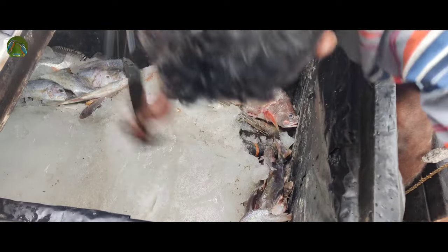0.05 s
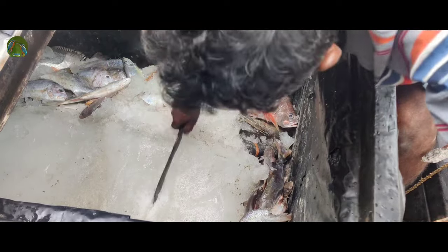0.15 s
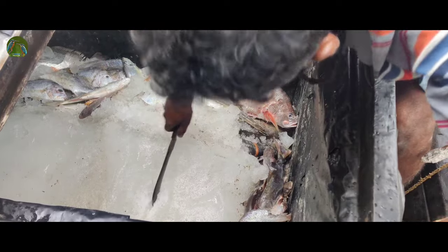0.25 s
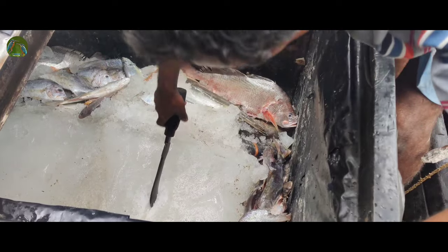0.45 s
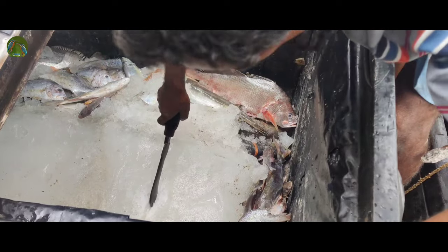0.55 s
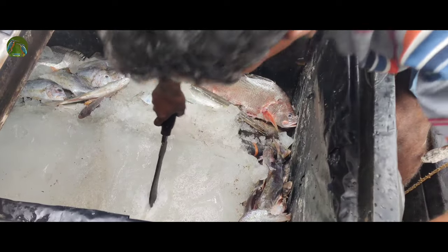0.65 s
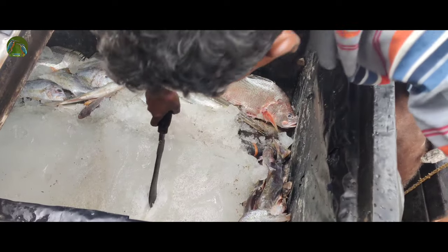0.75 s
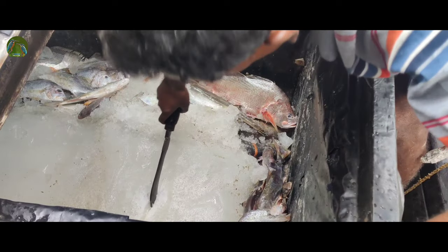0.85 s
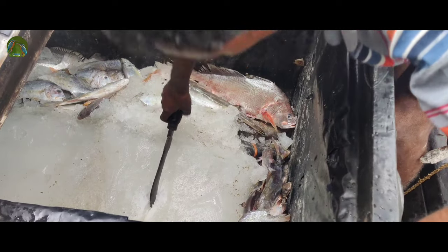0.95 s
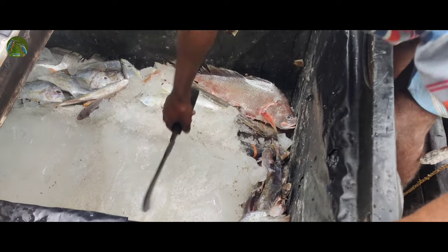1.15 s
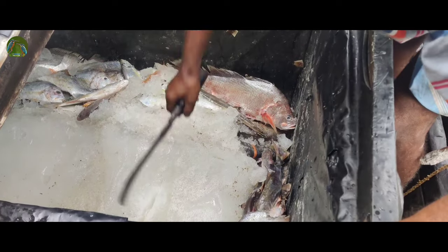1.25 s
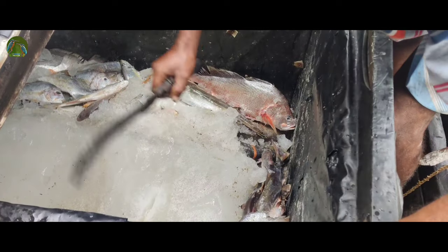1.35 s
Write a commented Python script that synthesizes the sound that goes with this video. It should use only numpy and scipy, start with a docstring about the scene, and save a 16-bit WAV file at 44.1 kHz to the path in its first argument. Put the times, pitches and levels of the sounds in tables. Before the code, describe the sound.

A steel spike crunches into ice once, then small chips tick down.

```python
"""A low outdoor rumble and faint scraping are heard first, with a small tick and a soft boom.
Then a steel spike crunches into a slab of ice in a fish chest, close to a phone: brittle fracture
gives broadband noise, and the steel rings in its normal modes. The point stops and the slab thumps
the chest, whose low modes boom on. Chips tick, the ice snaps and the spike slides out with a thin
rasp. Soft low bumps, groans and a faint far-off tone sound in the background after the blow."""
import sys
import numpy as np
from scipy import signal
from scipy.fft import rfft, irfft
from scipy.io import wavfile
from scipy.ndimage import uniform_filter1d

SR = 44100
rng = np.random.default_rng(int(sys.argv[2]) if len(sys.argv) > 2 else 0)


def materialize(psi):
    """Save the field psi as 16-bit PCM at rate SR to the path in sys.argv[1].

    A 1-D psi becomes a single channel; in a 2-D psi each row is a channel.
    """
    bounded = np.clip(np.atleast_2d(psi).T, -1, 1)
    quanta = np.round(bounded * 32767).astype(np.int16)
    wavfile.write(sys.argv[1], SR, quanta)


N = 61739
T = np.arange(N) / SR
STRIKE_S, STOP_S = .2399, .2471  # the point meets the ice; the slab takes the full blow

# Envelopes of the outdoor rumble, the scraping slush and the far-off tone: t/s, level/dB
RUMBLE_LEVEL = [(0, -48.5), (.12, -51), (.4, -43.5), (.52, -48), (.75, -51), (.95, -56), (1.4, -61)]
SCRAPE_LEVEL = [(0, -62.5), (.11, -68.5), (.18, -61), (.5, -62), (.74, -67.5), (.8, -63.5), (.88, -69),
                (1.27, -65), (1.4, -75)]
HUM_LEVEL = [(0, -88), (.5, -80), (.72, -69.5), (1.15, -79), (1.4, -87)]
# Spectral density of each noise source: f/Hz, relative level/dB
RUMBLE_SPECTRUM = [(20, -9), (45, 6.5), (90, 0), (150, -7.5), (220, -11.5), (330, -19), (480, -27),
                   (800, -34), (1500, -42.5), (4000, -64.5)]
SCRAPE_SPECTRUM = [(500, 1.5), (1000, -2), (2500, -1), (3400, -5), (6500, -4), (7500, -10), (11000, -10),
                   (15500, -15)]
CHIP_SPECTRUM = [(500, -13.5), (1000, -18), (1600, -3), (2100, -4.5), (2800, -1.5), (4200, -7.5), (6500, 1),
                 (9000, -11), (15500, -11.5)]
FROST_SPECTRUM = [(2000, -23), (5000, -8), (9000, -2.5), (15500, -0.5)]
CRUNCH_SPECTRUM = [(400, -14), (900, -9.5), (1700, 3.5), (2250, -6.5), (2790, 2.5), (3000, -6),
                   (3700, -3.5), (5500, -4.5), (7500, -11), (15500, -20.5)]
ECHO_SPECTRUM = [(500, -4.5), (1500, -5.5), (3000, -4.5), (6000, 1), (9000, -6.5), (15500, -13)]
SPLINTER_SPECTRUM = [(1000, -21), (4000, -6), (6000, 1), (8000, -13), (15500, -20.5)]
SHUDDER_SPECTRUM = [(60, -8.5), (130, 1.5), (280, -1), (550, -23), (3000, -55.5)]
SNAP_SPECTRUM = [(200, -21), (600, 6.5), (1500, 4.5), (3500, -1), (6000, -9.5), (15500, -23)]
# Loose chips landing: t/s, level/dB, T60/s, left-right difference/dB, tilt/(dB per octave)
CHIP_LANDINGS = [(0.05, -50, 0.052, 6, -7), (.383, -54, .048, 1, 4.5), (0.4213, -41, 0.035, 3, 0),
                 (.433, -56, 0.17, -1, 7.5), (0.4683, -46, 0.0081, 16, -11), (0.535, -47, 0.043, 1, 0),
                 (0.605, -57, 0.012, 5, 6), (.634, -57, .059, 0, 10), (.7305, -55, 0.017, 8, -.5)]
# Normal modes of the spike in the ice: f/Hz, relative level/dB
SPIKE_MODES = [(1396, -36), (1514, -34), (1614, -25.5), (1928, -32.5), (2210, -38), (2690, -31),
               (2760, -26), (3216, -35), (4448, -33.5), (5352, -34), (5460, -33), (5986, -32), (6520, -35),
               (6876, -36)]
# Splinters bursting from the hole: t/s, level/dB
SPLINTER_BURSTS = [(0.2443, -14.5), (0.2495, -16), (0.256, -23), (0.2592, -21.5), (0.2656, -25),
                   (0.2988, -42.5)]
# Normal modes of slab and chest: f/Hz, relative level/dB, T60/s, left-right difference/dB
CHEST_MODES = [(46.18, -10, 0.39, 0.4), (88, -11.5, 0.096, -1.5), (141, 4, 0.067, -1.54),
               (157, 19, .0237, -0.9), (258, 14, 0.024, 1.5), (428.6, 2, .037, -2.5),
               (642.5, -3.5, 0.032, -3), (900, -14.5, 0.026, -2)]
# Soft low bumps and groans in the background: t/s, f/Hz, level/dB, rise/s, T60/s
BUMP_TONES = [(.33, 160, -39, .025, .14), (.41, 108, -37, .05, .27), (.624, 320, -44, .006, .07),
              (.59, 146, -41, .12, .7), (.66, 162, -40, .06, .42), (.66, 73, -36, .08, .55),
              (.998, 82, -31.5, .035, .17)]
# Dry snaps of the ice around the spike: t/s, level/dB, left-right difference/dB
ICE_SNAPS = [(.5969, -32.5, 24), (1.0507, -38.5, 14)]
# Resonance of the shaft sliding out of its hole: t/s, f/Hz, level/dB
SLIDE_RESONANCE = [(0.883, 2772, -95), (1.06, 2640, -70.5), (1.251, 2353, -79), (1.4, 2257, -83)]


def undb(db):
    """Amplitude ratio for a level in decibels."""
    return 10 ** (np.asarray(db) / 20)


def pan(db):
    """Level-difference panning: left and right gains that lie db apart."""
    return undb(np.array([[db], [-db]]) / 2)


def contour(points):
    """Amplitude envelope by linear interpolation of (t/s, level/dB) points."""
    return undb(np.interp(T, *np.array(points).T))


def colour(x, points):
    """Minimum-phase filter through (f/Hz, level/dB) points; it conserves the power of white noise."""
    size = 8192
    hz, db = np.array(points).T
    gain = undb(np.interp(np.log(np.fft.rfftfreq(size, 1 / SR) + 1), np.log(hz), db))
    cepstrum = irfft(np.log(gain / np.sqrt(np.mean(gain ** 2))))
    cepstrum[1:size // 2] *= 2  # folding onto positive time makes the filter causal
    cepstrum[size // 2 + 1:] = 0
    response = irfft(np.exp(rfft(cepstrum)))
    return signal.fftconvolve(x, response[None], axes=1)[:, :N]


def stereo(draw, correlation):
    """Partial coherence: two channels mix an in-phase and an antiphase random signal."""
    shared = np.sqrt(1 + correlation) * draw()
    opposed = np.sqrt(1 - correlation) * draw() * np.array([[1], [-1]])
    return (shared + opposed) / np.sqrt(2)


def noise():
    """Gaussian white noise."""
    return rng.standard_normal(N)


def grains(per_s, spread_db):
    """Shot noise: tiny fractures of uneven size at random moments, rms 1."""
    impulses = (rng.random(N) < per_s / SR) * np.sign(noise())
    x = impulses * undb(spread_db * np.clip(noise(), -2, 2))
    return x / np.std(x)


def narrowband(hz, width_hz):
    """Slow random modulation spreads a carrier, steady or gliding, into a noise band, rms 1."""
    lowpass = signal.butter(2, width_hz / 2, fs=SR, output="sos")
    modulation = signal.sosfilt(lowpass, stereo(noise, 0) + 1j * stereo(noise, 0))
    carrier = np.exp(2j * np.pi * np.cumsum(hz * np.ones(N)) / SR)
    x = (modulation * carrier).real
    return x / np.std(x)


def burst(start, rise, t60):
    """Envelope of exponential growth and decay, all times in seconds."""
    age = np.maximum(T - start, 0)
    return (1 - np.exp(-age / rise)) * np.exp(-np.log(1000) * age / t60)


def ring(start, rise, hz, t60):
    """Damped oscillation of one mode."""
    return burst(start, rise, t60) * np.sin(2 * np.pi * hz * (T - start))


def rumble():
    """Outdoor noise of long wavelength is almost coherent at the two microphones."""
    return colour(stereo(noise, 0.97), RUMBLE_SPECTRUM) * contour(RUMBLE_LEVEL)


def scraping():
    """Friction of the spike on wet ice gives fine, dense shot noise."""
    grit = stereo(lambda: grains(per_s=12000, spread_db=2), -.05)
    return colour(grit, SCRAPE_SPECTRUM) * contour(SCRAPE_LEVEL)


def hum():
    """Narrowband noise is heard as a faint, wavering far-off tone."""
    return narrowband(hz=601, width_hz=36) * contour(HUM_LEVEL)


def chips():
    """Impacts of ice chips give gritty ticks; spectral tilt makes some duller and some brighter."""
    grit = stereo(lambda: grains(per_s=10000, spread_db=6.5), 0.073)
    out = 0
    for start, db, t60, side, tilt in CHIP_LANDINGS:
        spectrum = [(hz, level + tilt * np.log2(hz)) for hz, level in CHIP_SPECTRUM]
        tick = grit * burst(start, rise=.00092, t60=t60)
        out = out + undb(db) * pan(side) * colour(tick, spectrum)
    return out


def boom():
    """A damped low oscillation sounds during the downswing."""
    return -undb(-17) * ring(start=.135, rise=.041, hz=47.4, t60=.29)


def frost():
    """Brittle fracture of the surface frost gives a very short, bright transient."""
    breaking = stereo(noise, 0) * burst(STRIKE_S, rise=.00085, t60=.0064)
    return undb(-23) * colour(breaking, FROST_SPECTRUM)


def crunch():
    """Acoustic emission follows the force: it grows as the point bites, holds, and fades as it slows."""
    bite_s, hold_s, crush_t60_s = .0046, .0065, .057
    age = T - STRIKE_S
    bite = np.clip(age / bite_s, 0, 1) ** 2
    slowing = np.exp(-np.log(1000) * np.maximum(age - bite_s - hold_s, 0) / crush_t60_s)
    cracks = stereo(lambda: grains(per_s=8000, spread_db=4), 0.27)
    return undb(-21.5) * colour(cracks * bite * slowing, CRUNCH_SPECTRUM)


def wall_echo():
    """Reverberation: reflections from the chest walls merge into a decaying noise."""
    reflections = stereo(noise, 0) * burst(STRIKE_S, rise=.015, t60=.13)
    return undb(-23.5) * colour(reflections, ECHO_SPECTRUM)


def spike():
    """The steel rings in damped normal modes, frequency-modulated by the shifting grip of the ice."""
    lag_s, scatter_s, microphone_lag_s = .003, .0006, .00022
    waver_rms_hz, waver_s = 22, .005
    out = 0
    for hz, db in SPIKE_MODES:
        onset = STRIKE_S + lag_s + scatter_s * rng.random()
        arrival = onset + microphone_lag_s * rng.random((2, 1))
        grip = uniform_filter1d(noise(), int(waver_s * SR))
        cycles = hz * (T - arrival) + np.cumsum(waver_rms_hz * grip / np.std(grip)) / SR
        out = out + undb(db) * burst(arrival, rise=.0022, t60=.06) * np.sin(2 * np.pi * cycles)
    return undb(5) * out


def splinters():
    """Spalling: larger flakes break away in a quick run of bright cracks."""
    force = sum(undb(db) * burst(start, rise=.00083, t60=.01) for start, db in SPLINTER_BURSTS)
    return colour(stereo(noise, 0) * force, SPLINTER_SPECTRUM)


def thump():
    """Impact excitation: the slab drives the chest, neighbouring modes in opposite directions."""
    arrival = STOP_S + np.array([[0], [.00011]])  # later at the right microphone
    out = 0
    for k, (hz, db, t60, side) in enumerate(CHEST_MODES):
        polarity = (-1) ** (k + 1)
        out = out + polarity * undb(db) * pan(side) * ring(arrival, rise=.017, hz=hz, t60=t60)
    return undb(0.5) * out


def shudder():
    """Damped random vibration: the load in the chest shudders dully after the blow."""
    vibration = colour(stereo(noise, 1), SHUDDER_SPECTRUM)
    return undb(-24) * vibration * burst(STOP_S, rise=.012, t60=.18)


def bumps():
    """Damped oscillations are heard as soft low bumps and groans in the background after the blow."""
    return sum(undb(db) * ring(start, rise, hz, t60) for start, hz, db, rise, t60 in BUMP_TONES)


def snaps():
    """Each single fracture of the ice radiates an impulse with a brief noise tail."""
    out = 0
    for start, db, side in ICE_SNAPS:
        impulse = np.arange(N) == int(start * SR)
        tail = undb(-31.5) * stereo(noise, 0.72) * burst(start, rise=.00028, t60=.057)
        out = out + undb(db) * pan(side) * (tail - impulse)
    return colour(out, SNAP_SPECTRUM)


def slide():
    """Sliding friction: the shaft leaves its hole with a thin, falling rasp and a hiss."""
    times, hz, db = np.array(SLIDE_RESONANCE).T
    rasp = narrowband(np.interp(T, times, hz), width_hz=270)
    hiss = undb(-1) * narrowband(hz=6170, width_hz=670)
    return (rasp + hiss) * undb(np.interp(T, times, db))


def close_pair(x):
    """Long waves reach closely spaced microphones alike, so the difference signal loses its bass."""
    highpass = signal.butter(1, 1380, "high", fs=SR, output="sos")
    side = signal.sosfilt(highpass, (x[0] - x[1]) / 2)
    return x.mean(axis=0) + side * np.array([[1], [-1]])


def scene():
    """Superposition of the background, the breaking ice, the blow, the snaps and the sliding shaft."""
    background = rumble() + scraping() + hum() + bumps()
    ice = close_pair(chips() + frost() + crunch() + wall_echo() + splinters())
    blow = boom() + spike() + thump() + shudder()
    return background + ice + blow + snaps() + slide()


def record(dry):
    """Band limiting: the phone cuts the highest treble with a steep low-pass filter."""
    cutoff_hz = 15450
    return signal.sosfilt(signal.ellip(10, .2, 80, cutoff_hz, fs=SR, output="sos"), dry)


dry = scene()
out = record(dry)
materialize(out)
```